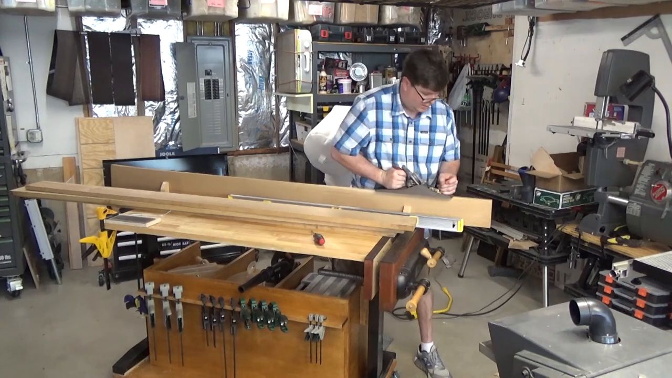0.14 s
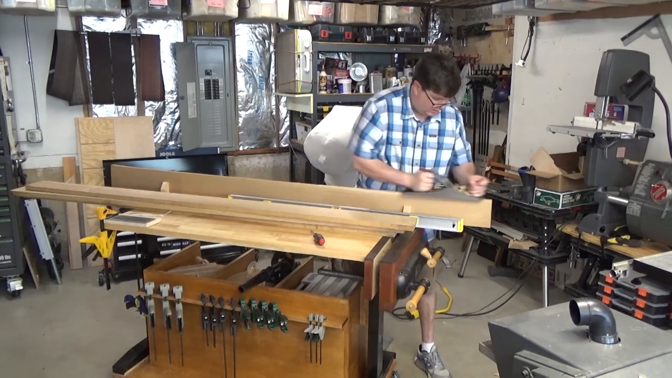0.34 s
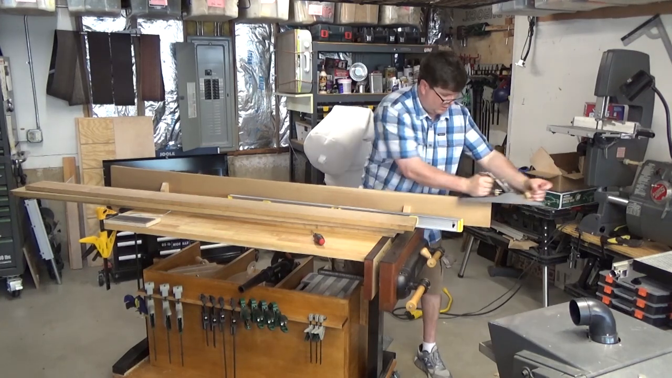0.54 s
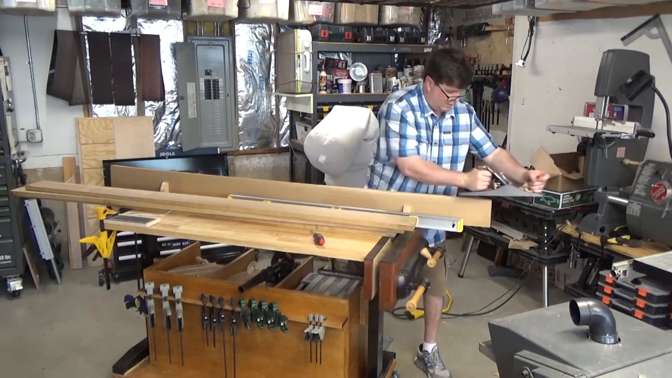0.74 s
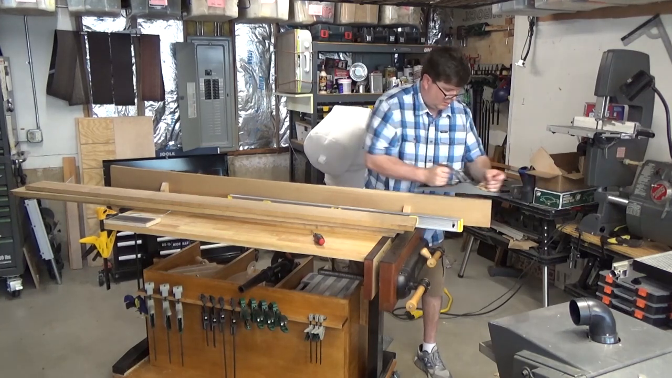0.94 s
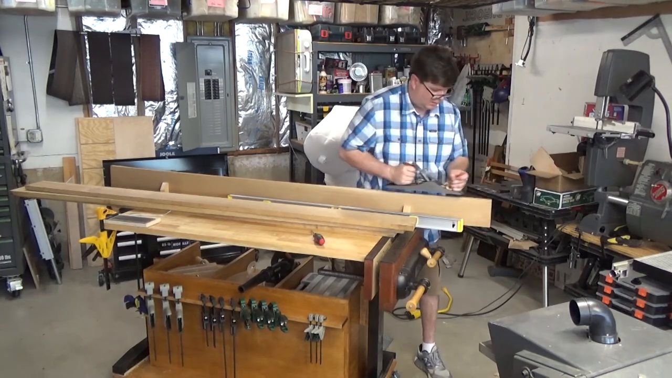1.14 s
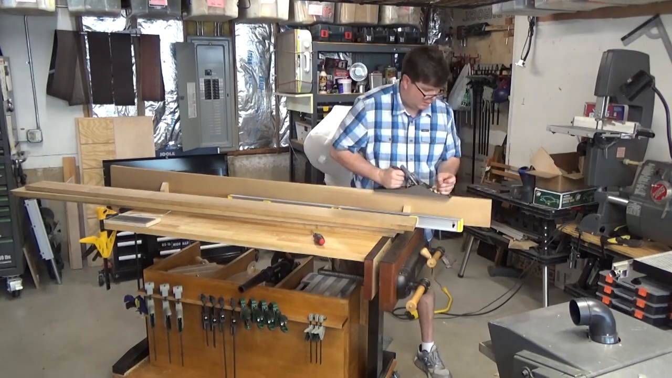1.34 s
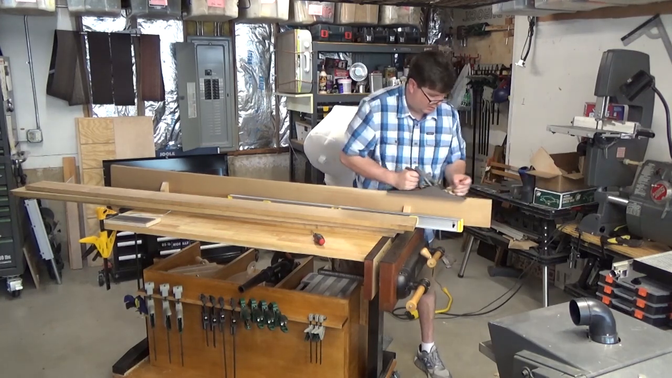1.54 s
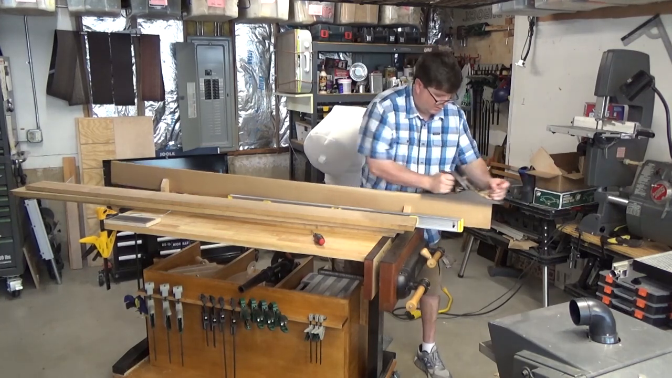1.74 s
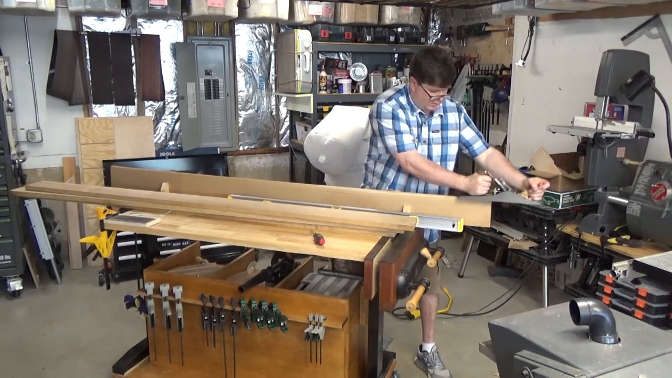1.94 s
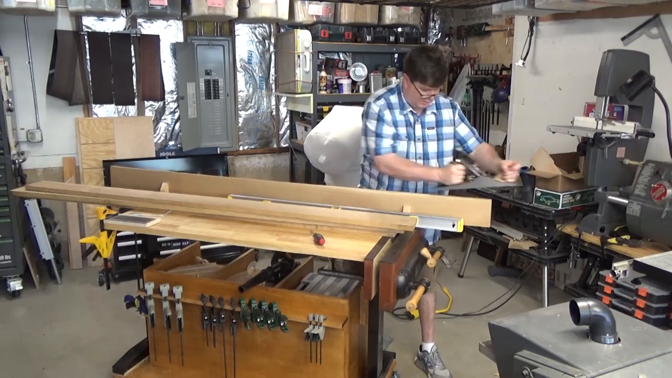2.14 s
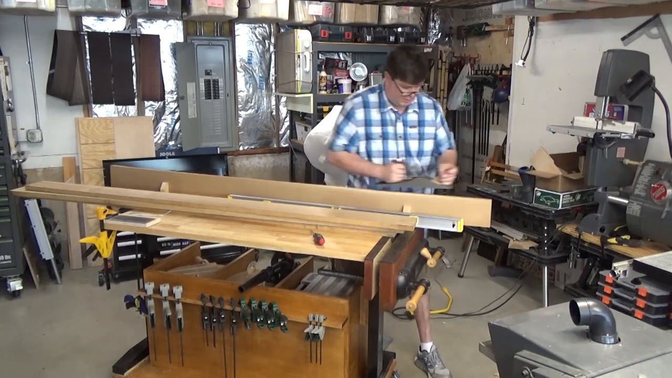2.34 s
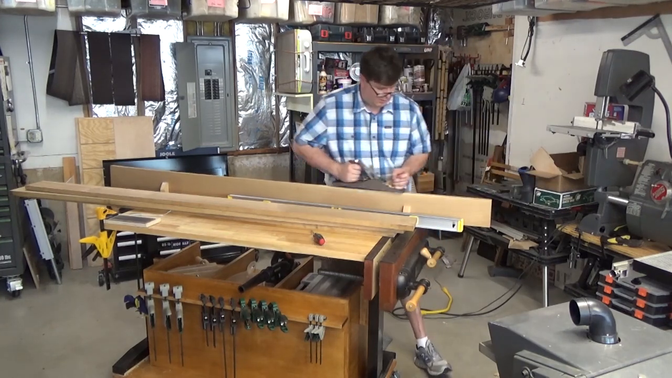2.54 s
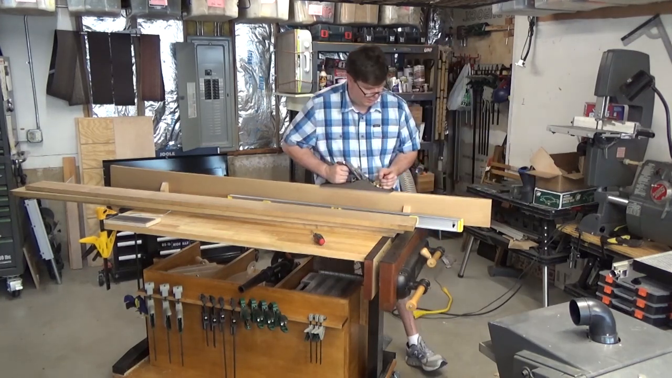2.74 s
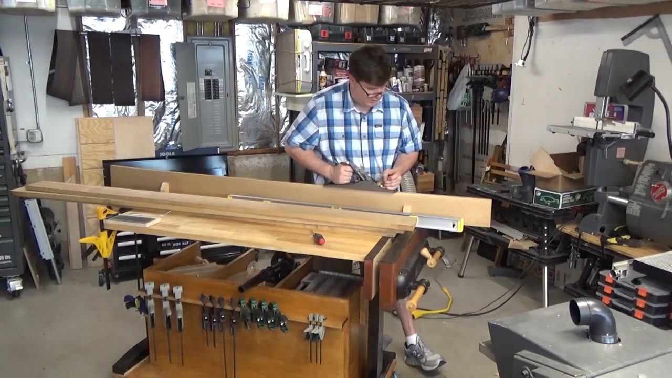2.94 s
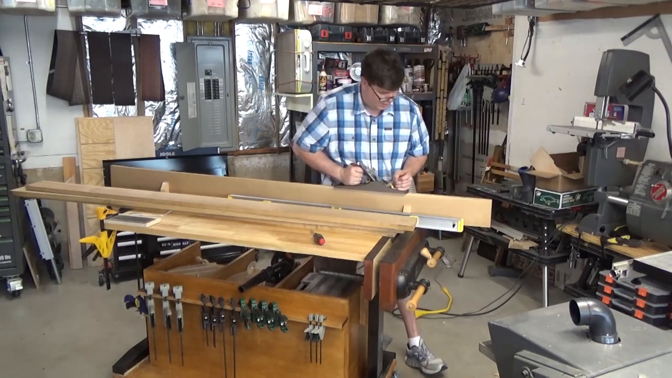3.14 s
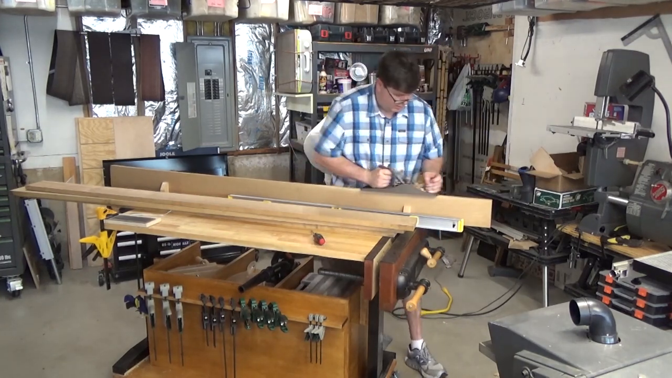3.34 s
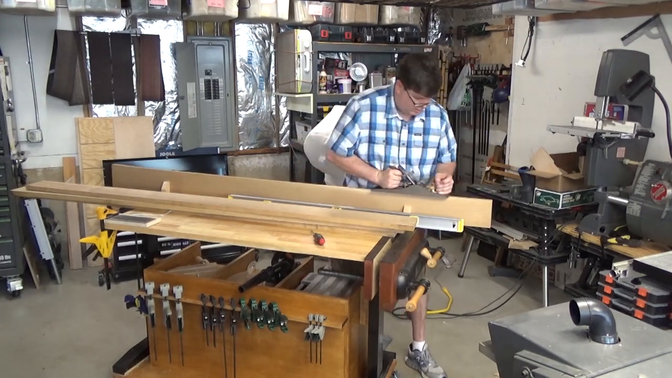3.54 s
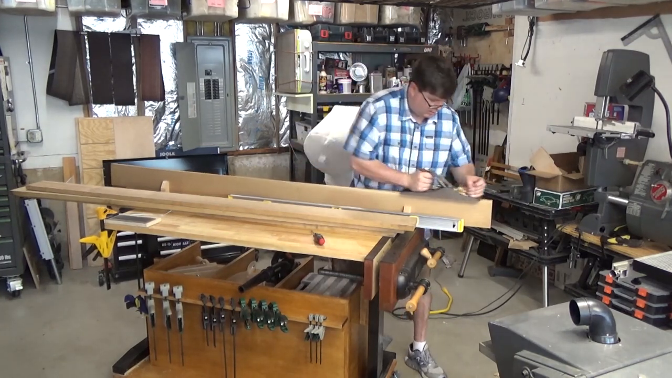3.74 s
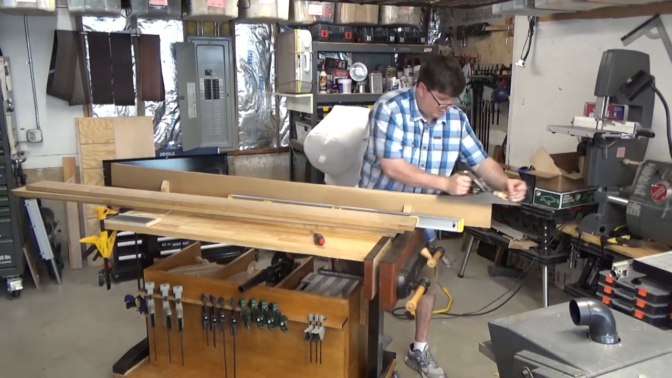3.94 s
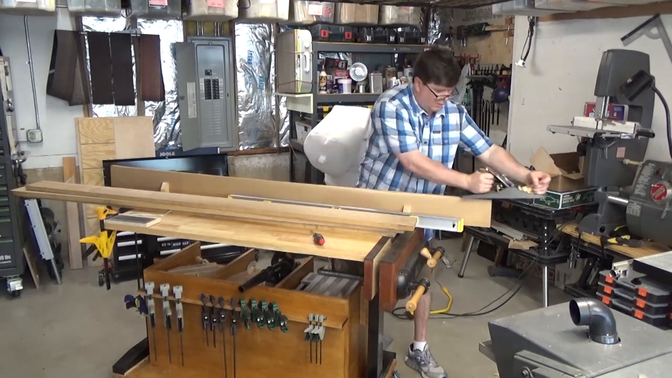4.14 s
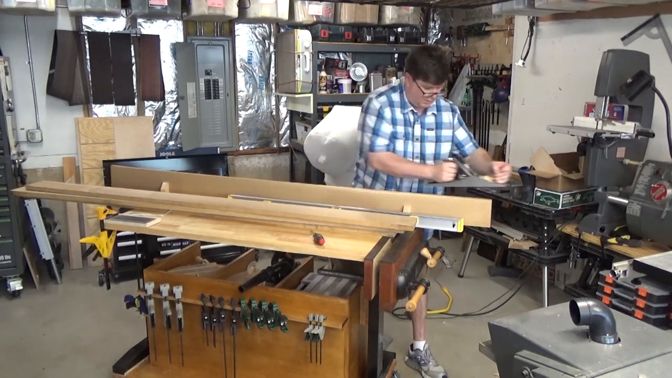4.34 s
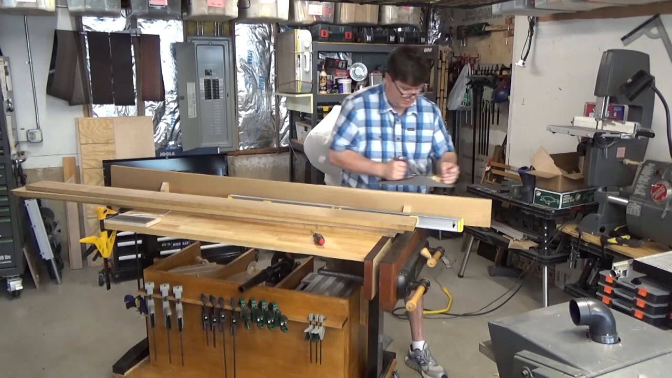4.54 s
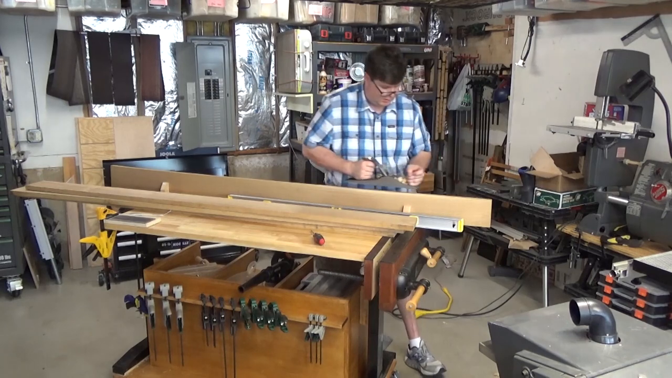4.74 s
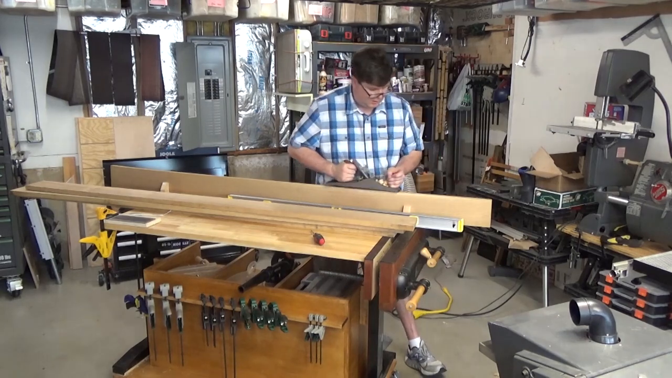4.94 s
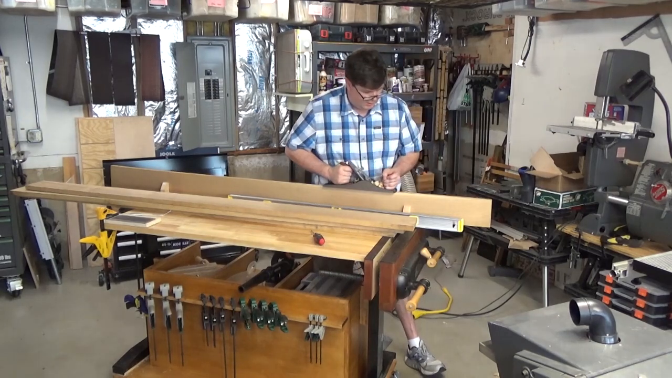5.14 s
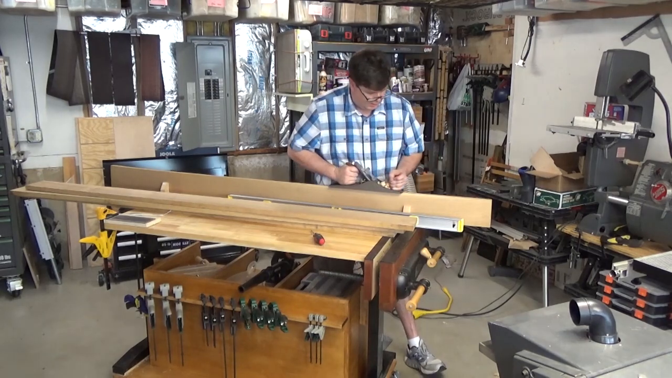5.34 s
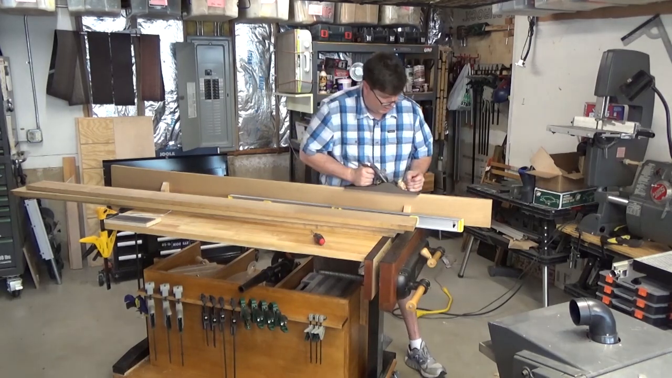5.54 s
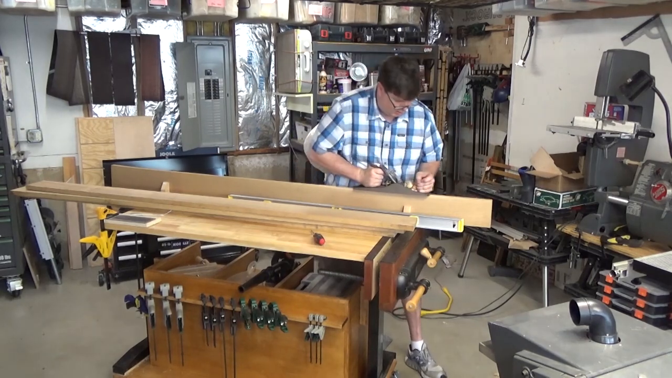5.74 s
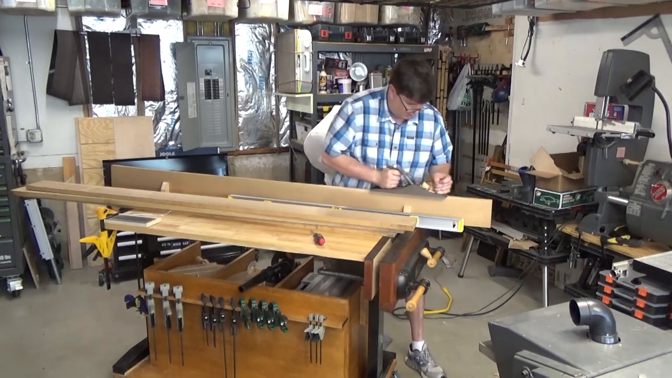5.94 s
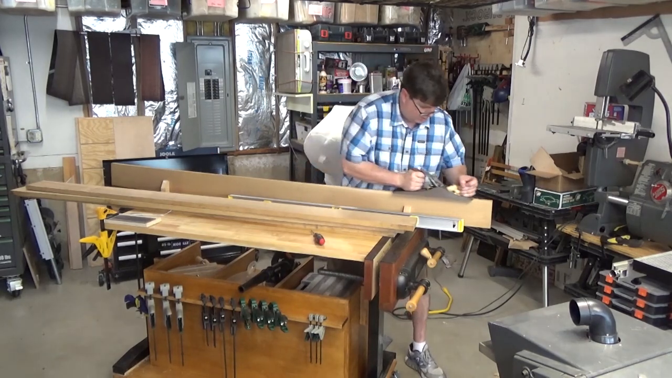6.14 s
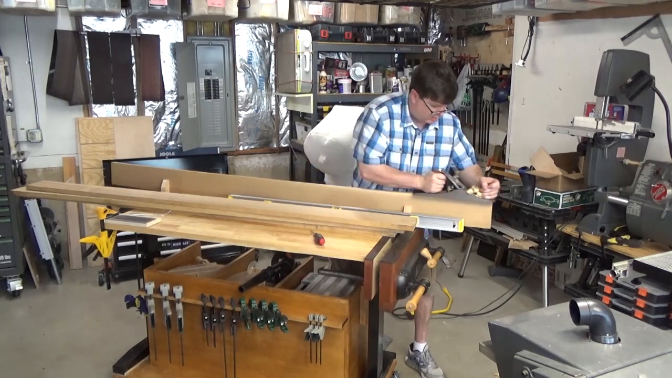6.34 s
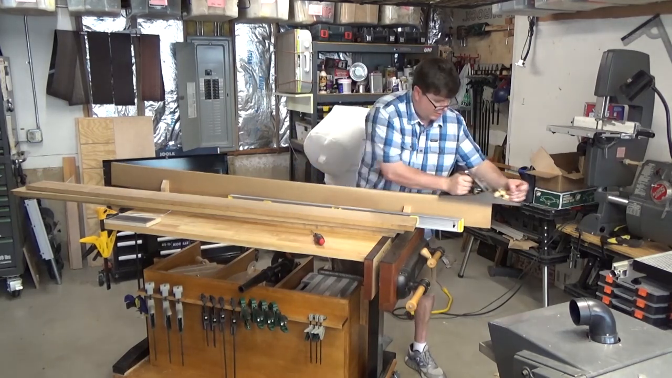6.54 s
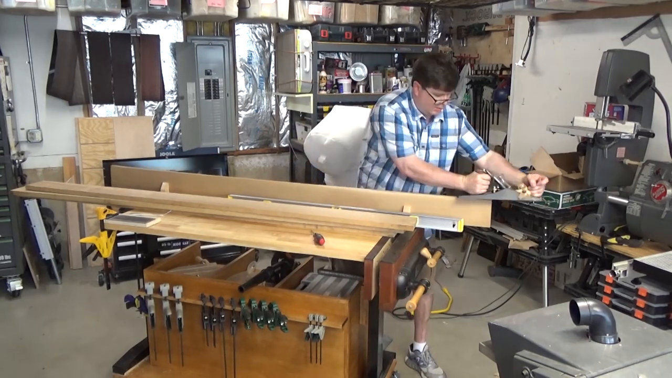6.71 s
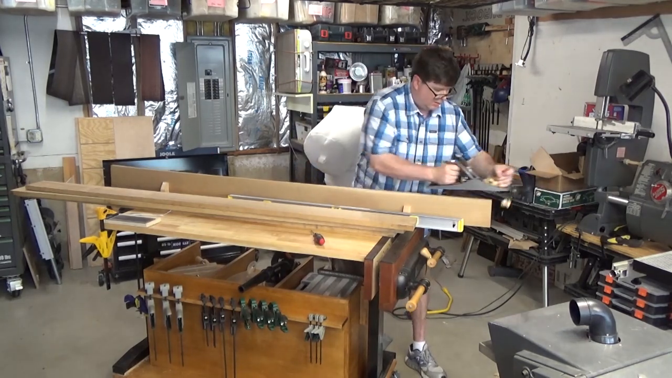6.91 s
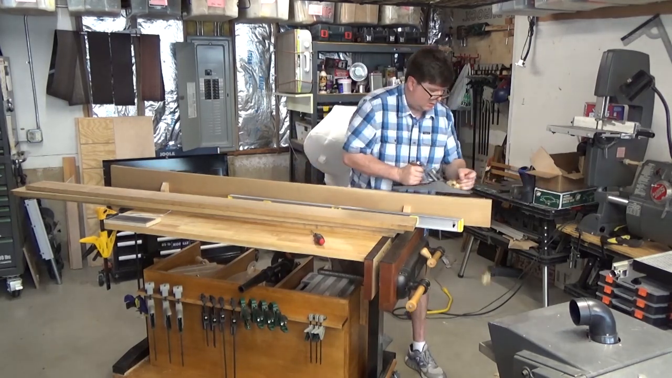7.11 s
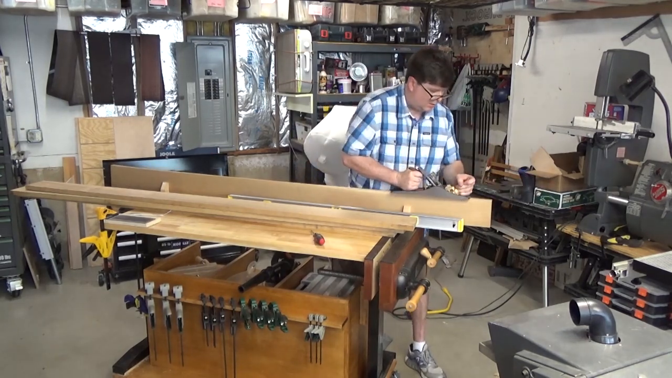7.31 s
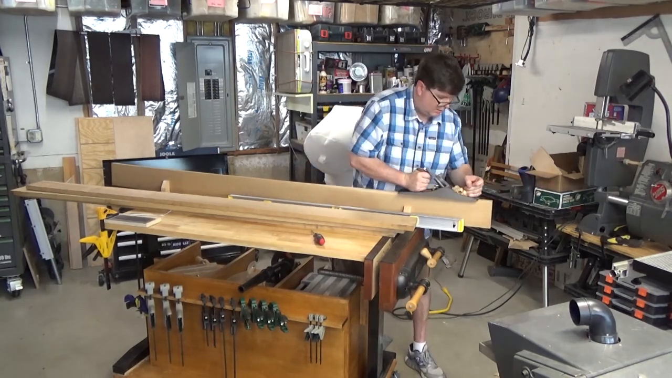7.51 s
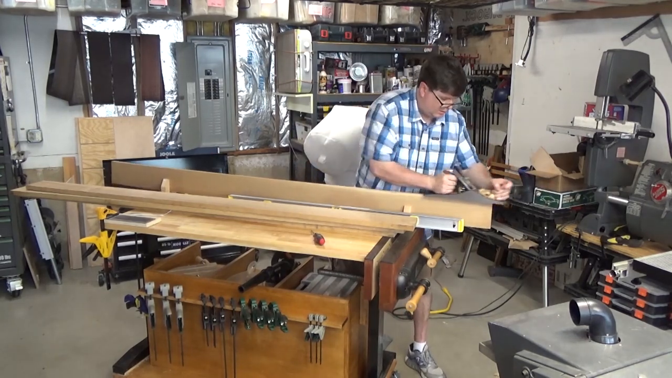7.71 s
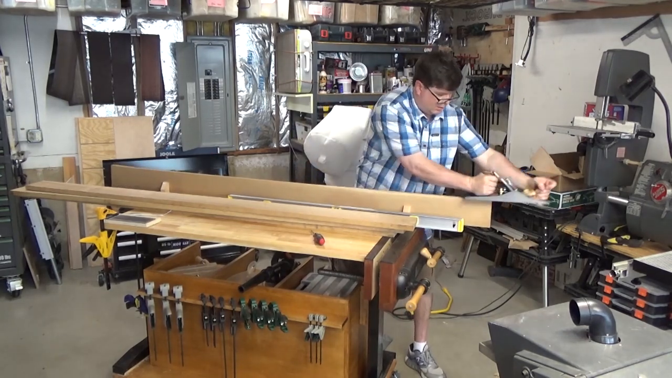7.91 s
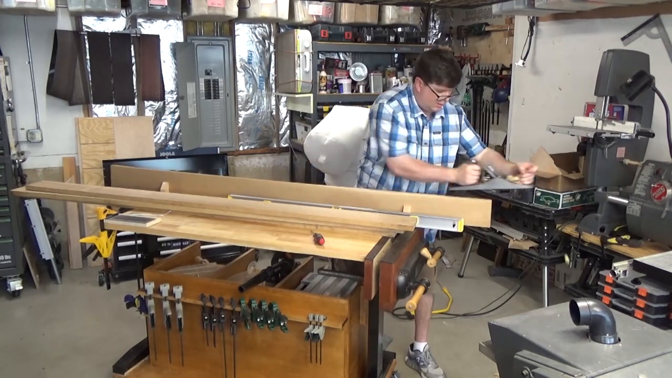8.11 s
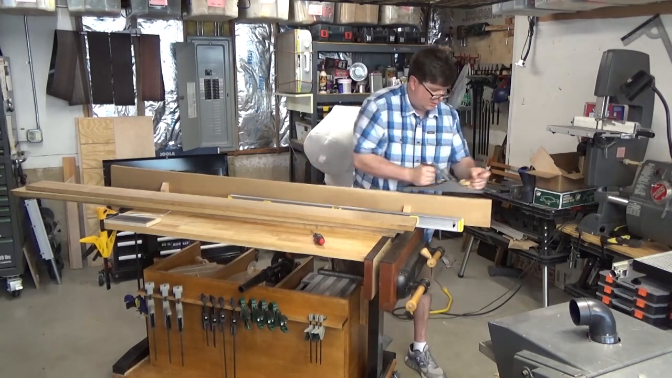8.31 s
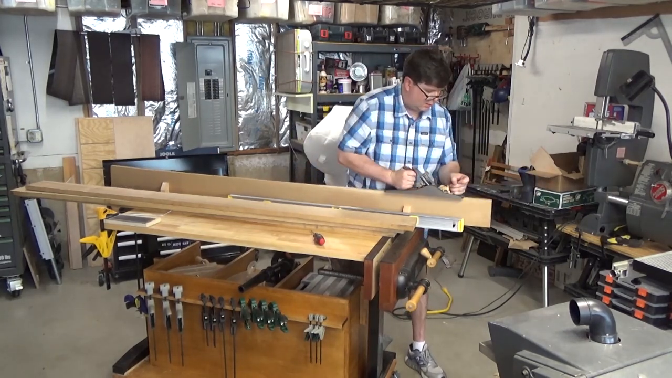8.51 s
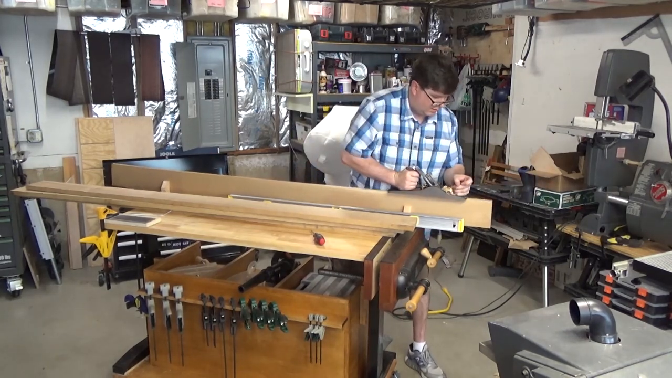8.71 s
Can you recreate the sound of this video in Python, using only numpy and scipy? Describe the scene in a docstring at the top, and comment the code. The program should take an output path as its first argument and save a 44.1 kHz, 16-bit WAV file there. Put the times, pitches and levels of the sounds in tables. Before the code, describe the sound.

A hand plane rasps and hisses through five uneven push strokes along an oak board, with wooden knocks between, in a reverberant workshop.

```python
"""In a small workshop a hand plane takes five push strokes, and starts a sixth, along a long oak board on a bench.
Bunched random fractures, shaped by effort and speed, hiss and rasp, and ring the iron, body, sole and board.
The shaving snaps at a pitch that follows the speed; noise bursts tick.
The board knocks and rattles at touches, drops and run-offs; moving reverberation answers the plane.
Behind it lie still air, a faint fan tone and a thin throbbing whine."""
import sys
import numpy as np
from scipy import signal
from scipy.fft import rfft, irfft, next_fast_len
from scipy.io import wavfile
from scipy.ndimage import uniform_filter1d

SR = 44100
rng = np.random.default_rng(int(sys.argv[2]) if len(sys.argv) > 2 else 0)


def bounce(signal):
    """Save signal as a 16-bit WAV file at the path given by the first command-line argument."""
    frames = np.transpose(np.atleast_2d(signal))
    limited = np.clip(frames, -1, 1)
    pcm = np.round(limited * 32767).astype(np.int16)
    wavfile.write(sys.argv[1], SR, pcm)


N = 386757
T = np.arange(N) / SR
TOP_HZ = 15350

# plane body resonances: (frequency [Hz], width [Hz], level [dB])
PLANE_MODES = [(1130, 130, -6), (1615, 46, 4), (1697, 54, 3.5), (1802, 35, 4.5), (2142, 110, 1.5),
               (2425, 56, 3), (2657, 35, 3.5), (2980, 99, -17), (3218, 41, 4), (3280, 22, 11.5),
               (3150, 25, -14.5)]
# board resonances: (frequency [Hz], width [Hz], level [dB])
BOARD_MODES = [(141, 10.4, -15.5), (199.6, 37, -14.5), (257, 34.6, -10.5), (331.6, 33, 0.5),
               (395.7, 41.2, -0.5), (446, 65, -1.5), (537, 103, -3.5), (640, 81, -2.5), (768, 125, -3),
               (858, 90, -0.5), (960, 120, 1), (1198, 213, -1.5), (1367, 199, -1), (1800, 345, -3.5),
               (2620, 460, -6), (3280, 610, -15.5)]


def undb(db):
    """Decibels to gain."""
    return 10 ** (np.asarray(db) / 20)


def unit(x):
    """Scale to rms 1."""
    return x / np.sqrt(np.mean(x ** 2))


def on_log(points, hz):
    """Read (Hz, value) points on a log-frequency axis."""
    f, value = np.transpose(points)
    return np.interp(np.log(hz + 1), np.log(f), value)


def colour(points, size=2048):
    """Minimum-phase response of unit energy with the given spectrum, by folding the cepstrum."""
    level_db = on_log(points, np.fft.rfftfreq(size, 1 / SR))
    cepstrum = irfft(np.log(undb(level_db)))
    cepstrum[1:size // 2] *= 2
    cepstrum[size // 2 + 1:] = 0
    h = irfft(np.exp(rfft(cepstrum)))
    return h / np.linalg.norm(h)


def ring(modes, size=8192):
    """Impulse response of unit energy: one damped sine a mode, with alternating signs."""
    t = T[:size]
    h = np.zeros(size)
    for k, (hz, width_hz, db) in enumerate(modes):
        decay = np.exp(-np.pi * width_hz * t)
        h += (-1) ** k * undb(db) * width_hz * decay * np.sin(2 * np.pi * hz * t)
    return h / np.linalg.norm(h)


def through(x, h):
    """Pass a sound through a response."""
    return signal.oaconvolve(x, h)[:N]


def filtered(x, order, hz, kind="low"):
    """Butterworth filter."""
    return signal.sosfilt(signal.butter(order, hz, kind, fs=SR, output="sos"), x)


def walk(rate_hz):
    """Smooth random wander of rms 1."""
    k = int(SR / rate_hz)
    held = np.repeat(rng.standard_normal(N // k + 1), k)
    return unit(uniform_filter1d(held, k)[:N])


def slips(rate_hz, spread_db):
    """Random tiny fractures of uneven size and either sign, scaled to rms 1."""
    happens = rng.random(N) < rate_hz / SR
    sign = rng.choice([-1, 1], N)
    return unit(happens * sign * undb(spread_db * rng.standard_normal(N)))


def even(burst, size):
    """Give a one-second burst unit energy and a level spectrum, smoothed over size half-hertz steps."""
    spectrum = rfft(burst, 2 * SR)
    power = uniform_filter1d(abs(spectrum) ** 2, size)
    burst = irfft(spectrum / np.sqrt(power))[:SR]
    return burst / np.linalg.norm(burst)


def background(whine_hz=4000, throb_hz=29.97):
    """Mid and side of still air (coloured noise); fan tone (ringing noise) and throbbing whine in the mid."""
    # (frequency [Hz], level [dB])
    air_spectrum = [(15, -64), (25, -21), (96, -6), (113, -10), (148, -4), (433, -2), (722, -3), (895, 0.5),
                    (1050, -5.5), (1140, -2.5), (3340, -7), (4040, -10.5), (4380, -8), (15500, -21)]
    air = undb(-54) * np.array([through(rng.standard_normal(N), colour(air_spectrum)) for _ in range(2)])
    fan = through(rng.standard_normal(N), ring([(898, 25, 0)]))
    throb = np.exp(4.5 * np.cos(2 * np.pi * throb_hz * (T - .02)))
    whine = unit(throb * np.sin(2 * np.pi * whine_hz * T))
    air[0] += undb(-66) * fan + undb(-63.5) * whine
    return air


def room_tail(build_s=0.00091):
    """Dense reflections off the cluttered walls: noise decaying at a rate set by frequency; unit energy."""
    # (frequency [Hz], decay time to -60 dB [s])
    decay_times = [(150, 0.46), (500, 0.4763), (2000, 0.5266), (5500, 0.5456), (11000, 0.39)]
    hz, t, cells = signal.stft(rng.standard_normal(SR), SR, nperseg=256)
    decay = np.exp(-np.log(1000) * t / on_log(decay_times, hz)[:, None])
    tail = signal.istft(cells * decay, SR)[1][:SR]
    # many modes overlap, so the room favours no broad band
    return even(tail * (1 - np.exp(-T[:SR] / build_s)), size=70)


def room(x, count=5, turn_hz=3.3):
    """Crossfade round several tails: plane and worker keep moving, so the reflections keep changing."""
    place = 2 * np.pi * (turn_hz * T + 0.14 * walk(5))
    shares = np.array([np.maximum(np.cos(place + 2 * np.pi * k / count), 0) for k in range(count)])
    shares /= np.linalg.norm(shares, axis=0)
    return sum(through(x * share, room_tail()) for share in shares)


def ticks(size=16384):
    """Ticks, crinkles and a tiny squeak of shaving and iron: decaying band-passed noise bursts."""
    # (time [s], relative level [dB], centre [Hz], width [octaves], decay [s])
    tick_rows = [(0.071, -7.5, 5300, 1.4, 0.0026), (1.23, -29, 7350, .45, 0.01),
                 (2.025, -6, 2780, 2.4, 0.029), (2.119, -10.5, 5060, 1.4, 0.0035),
                 (2.125, -7.5, 2230, 1.15, 0.059), (2.285, -23, 5760, 1, 0.0017),
                 (2.76, -24, 3000, 2, 0.039), (3.13, -12.5, 4900, 0.97, 0.0052),
                 (8.635, -27, 5200, 0.13, .04), (8.672, -8.5, 4300, 1.5, 0.0026)]
    out = np.zeros(N + size)
    for s, db, hz, octaves, decay_s in tick_rows:
        crack = rng.standard_normal(size) * np.exp(-T[:size] / decay_s)
        half_width = 2 ** (octaves / 2)
        crack = filtered(crack, 2, [hz / half_width, min(hz * half_width, TOP_HZ)], "band")
        i = int(s * SR)
        out[i:i + size] += undb(db + 13.0) * crack / np.linalg.norm(crack)
    return out[:N]


def rattle(rattle_db, decay_s, gap_s=.015, scatter_db=1.5, chatter_hz=1100, count=32):
    """Dull, dying chatter of the board on the bench: unevenly spaced, low-passed blows."""
    lag_s = gap_s * (np.arange(count) + rng.uniform(0.596, 1.4, count))
    size = undb(rattle_db + scatter_db * rng.standard_normal(count)) * np.exp(-lag_s / decay_s)
    size *= rng.choice([-1, 1], count)
    blows = np.zeros(SR)
    np.add.at(blows, np.minimum(lag_s * SR, SR - 1).astype(int), size)
    return filtered(blows, 1, chatter_hz)


def knocks(landing_s=0.0019, scuff_s=0.008):
    """Blows and chatter ring board and bench, a scuff clicks; soft contact leaves only the low modes."""
    # toe touches the board: (time [s], relative level [dB], contact softness [Hz], bench thud [dB])
    touch_rows = [(1.377, -10.5, 1630, -8.5), (2.653, -15.5, 1046, -4.5), (5.099, -12, 1120, -6.5),
                  (7.308, -10.5, 960, -3.5), (8.543, -8.5, 820, -6)]
    # whole sole drops flat: (time [s], relative level [dB], contact softness [Hz], bench thud [dB])
    drop_rows = [(0.002, -12.5, 1530, -8), (1.43, 0.5, 1520, -10), (2.772, -22.5, 1190, -5.5),
                 (7.355, 1.5, 1346, -13.5), (8.612, -7.5, 825, -16)]
    # plane runs off the end, board springs back:
    # (time [s], relative level [dB], contact softness [Hz], bench thud [dB])
    run_off_rows = [(0.604, -11.5, 660, -13), (2.009, 2.5, 755, -11.5), (4.052, -8.5, 676, -14),
                    (6.668, -2.5, 638, -13), (7.967, -1, 700, -12)]
    # what each kind of contact sets off: (rattle [dB], rattle decay [s], metal click [dB])
    touch_contact = (0, 0.073, -13)
    drop_contact = (-6.5, 0.027, -19.5)
    run_off_contact = (-1.5, .11, -15)
    # low modes of the bench under the board: (frequency [Hz], width [Hz], level [dB])
    bench_modes = [(246, 42, -8), (271, 43, -4.5), (325.6, 34.3, 2.5), (378.3, 39.6, -1), (474, 29.3, -7)]
    # click spectrum: (frequency [Hz], level [dB])
    click_spectrum = [(100, -62), (1000, 6.5), (2500, 10), (4000, 3), (6500, -0.5), (9500, -10.5),
                      (11000, -18), (15000, -33)]

    force, thud, clicks = np.zeros((3, N))
    kinds = [(touch_rows, touch_contact), (drop_rows, drop_contact), (run_off_rows, run_off_contact)]
    events = [(*row, *contact) for rows, contact in kinds for row in rows]
    for s, db, soft_hz, thud_db, rattle_db, decay_s, click_db in events:
        # the long sole meets the wood over a few milliseconds
        landing = rng.standard_normal(SR) * T[:SR] * np.exp(-T[:SR] / landing_s)
        blows = rattle(rattle_db, decay_s) + even(landing, size=300)
        push = undb(db) * filtered(blows, 3, soft_hz)
        # the steel sole lands with a short gritty scuff
        scuff = rng.standard_normal(SR) * np.exp(-T[:SR] / scuff_s)
        scuff *= undb(db + click_db) / np.linalg.norm(scuff)
        i = max(int(s * SR), 0)
        force[i:i + SR] += push[:N - i]
        thud[i:i + SR] += undb(thud_db) * push[:N - i]
        clicks[i:i + SR] += scuff[:N - i]
    board = undb(20.5) * through(force, ring(BOARD_MODES))
    bench = undb(23.0) * through(thud, ring(bench_modes))
    return board + bench + undb(20.5) * through(clicks, colour(click_spectrum))


def pushes(attack_db_per_s=300, release_db_per_s=800):
    """Effort and speed of the plane; the effort rises quickly before each push and collapses after it."""
    # one table a push, first bite until the iron leaves the wood: (time [s], effort [dB], speed [m/s])
    push_1 = [(0, -31.5, 0.73), (0.077, -24, 0.78), (0.176, -30.5, 0.55), (0.317, -19.5, 0.61),
              (0.352, -15, 1.13), (0.451, -10.5, 2.09), (0.501, -3, 2.22), (0.55, -24, 0.56)]
    push_2 = [(1.555, -26.5, 0.64), (1.59, -27, 0.89), (1.657, -15, 2.16), (1.723, -18, 1.05),
              (1.853, -9, 1.7), (1.89, -15.5, 1), (1.919, -16.5, 0.6)]
    # nearly stalls halfway: (time [s], effort [dB], speed [m/s])
    push_3 = [(2.94, -42.5, 0.66), (3.061, -27, 0.64), (3.13, -27, 0.8), (3.18, -31.5, 0.52),
              (3.31, -26, 0.82), (3.386, -12, 2.34), (3.43, -15, 0.93), (3.479, -26, 0.54),
              (3.594, -28, 0.62), (3.643, -21, 0.5), (3.74, -15.5, 1.2), (3.878, -15, 1.16),
              (4.003, -11.5, 1.03), (4.035, -21.5, 0.72)]
    # slow and laboured: (time [s], effort [dB], speed [m/s])
    push_4 = [(5.33, -42, 0.58), (5.52, -26, 1.05), (5.585, -27, 0.58), (5.66, -29.5, 0.54),
              (5.78, -26, 0.57), (5.85, -22, 0.59), (5.99, -20, 0.64), (6.05, -22, 0.99), (6.2, -18, 0.74),
              (6.36, -17.5, 0.68), (6.469, -16, 0.72), (6.521, -14.5, 0.8), (6.576, -13, 0.9),
              (6.62, -13, 0.69)]
    push_5 = [(7.41, -36, 0.92), (7.53, -32.5, 0.69), (7.626, -16.5, 0.67), (7.705, -17.5, 0.77),
              (7.808, -13, 1), (7.876, -13.5, 0.82), (7.902, -21.5, 0.6)]
    # only just begun: (time [s], effort [dB], speed [m/s])
    push_6 = [(8.621, -32.5, 0.53), (8.673, -26.5, 0.74), (8.761, -49.5, 0.93)]
    effort, speed = np.zeros(N), np.ones(N)
    for push in (push_1, push_2, push_3, push_4, push_5, push_6):
        s, db, m_per_s = np.transpose(push)
        before_s, after_s = np.maximum(s[0] - T, 0), np.maximum(T - s[-1], 0)
        fade_db = attack_db_per_s * before_s + release_db_per_s * after_s
        gain = undb(np.interp(T, s, db) - np.minimum(fade_db, 200))
        speed = np.where(gain > effort, np.interp(T, s, m_per_s), speed)
        effort = np.maximum(effort, gain)
    return effort, speed


def response(speed, law):
    """Gain of one part of the cutting sound: a bell round its best speed, on a low plateau."""
    best, octaves, gain_db, rest_db = law
    bell = np.exp(-(np.log2(np.maximum(speed, 1e-3) / best) / octaves) ** 2)
    return undb(gain_db) * np.sqrt(bell + undb(rest_db) ** 2)


def hissing_shaving(drive):
    """Breaking fibres heard through the shaving."""
    # (frequency [Hz], level [dB])
    shaving_spectrum = [(1500, -28), (2400, -3.5), (3200, -1.5), (3800, -5), (4400, -1), (6700, 1.5),
                        (7300, -5), (9700, -9.5), (11000, -16.5), (14000, -25), (16000, -54)]
    return undb(-1.3) * through(slips(6000, spread_db=3.0) * drive, colour(shaving_spectrum))


def torn_fibres(drive):
    """Sparser tears rasp in the wood."""
    # (frequency [Hz], level [dB])
    rasp_spectrum = [(200, -81), (600, -27.5), (1000, -3.5), (1300, 4), (1800, 3), (2200, 1), (3400, 1.5),
                     (4000, -8), (7000, -38)]
    return undb(0.5) * through(slips(2500, spread_db=3.5) * drive, colour(rasp_spectrum))


def ringing_iron(drive):
    """Jolts of the cutting edge ring the iron."""
    # (frequency [Hz], width [Hz], level [dB])
    iron_modes = [(3216, 34, -8), (4450, 120, -8), (4970, 39, -19), (5060, 45, -10), (5560, 29.24, -2),
                  (5930, 32, 4), (6700, 45, 0), (6515, 140, 0.5), (8040, 112.5, -14), (8090, 160, -1.5),
                  (9380, 140, -6)]
    return undb(-13.0) * through(slips(3000, spread_db=2.0) * drive, ring(iron_modes))


def ringing_body(drive):
    """Jolts of the cutting edge ring the cast body."""
    return undb(-2.5) * through(slips(1500, spread_db=0.5) * drive, ring(PLANE_MODES))


def dragging_sole(drive):
    """The sole sticks and slips, ringing its modes."""
    # (frequency [Hz], width [Hz], level [dB])
    sole_modes = [(638, 55, -7), (786, 102, -6), (865.2, 30.7, 1.5), (941, 43, -2), (980, 96, -7),
                  (1198, 193, -12.5)]
    return undb(0.14) * through(slips(700, spread_db=1.0) * drive, ring(sole_modes))


def juddering_board(gain):
    """Sparse slips ring the board near a stall."""
    # (frequency [Hz], level [dB])
    judder_spectrum = [(30, -15), (130, -14.5), (205, 2.5), (270, 0), (380, -2), (500, 3), (750, -9),
                       (1500, -12)]
    board = through(slips(400, spread_db=3.5), ring(BOARD_MODES))
    return undb(3.1) * unit(through(board, colour(judder_spectrum))) * gain


def snapping_curl(speed, drive, snap_step_m=.00053, jitter=.2):
    """The shaving snaps at short uneven steps, a rough tone that follows the speed and rings the body."""
    hz = speed / snap_step_m * (1 + jitter * walk(900))
    snapping = unit(walk(400) * np.sin(2 * np.pi * np.cumsum(hz) / SR)) * drive
    return snapping + undb(-8.5) * through(snapping, ring(PLANE_MODES))


def strokes():
    """Fibres break in bunches as the iron crosses the grain; the sole sticks and slips behind it."""
    # hiss, rasp, snap, drag, judder:
    # (best speed [m/s], range [octaves], gain [dB], share left at other speeds [dB])
    cut_laws = [(1.23, 0.48, -0.48, -5.5), (0.95, 0.49, -5, -15), (0.68, 0.38, -8, -26),
                (.35, 0.79, 0.86, -23), (0.39, .29, 6, -38)]
    effort, speed = pushes()
    # a fast plane hisses, a slower one rasps, then the sole drags, and near a stall the board judders
    hiss, rasp, snap, drag, judder = (effort * response(speed, law) for law in cut_laws)
    grain = unit(undb(2.15 * walk(260) + 2.0 * walk(45)))
    wood = hissing_shaving(grain * hiss) + torn_fibres(grain * rasp)
    metal = ringing_iron(grain * hiss) + ringing_body(grain * rasp)
    friction = dragging_sole(grain * drag) + juddering_board(judder)
    return wood + metal + friction + snapping_curl(speed, grain * snap)


def scene():
    """The bench stands a few metres off: room louder than direct sound, bass nearly alike on both sides."""
    # (frequency [Hz], side gain [dB])
    side_width = [(60, -21.5), (130, -46), (260, -28), (520, -15), (1200, -7.5), (2500, -8), (8500, -9),
                  (11500, -29)]
    # a slim board radiates almost no deep bass
    dry = filtered(strokes() + knocks() + ticks(), 3, 130, "high")
    air_mid, air_side = background()
    wet = undb(-1.64) * dry
    mid = undb(-6.0) * dry + room(wet) + air_mid
    side = room(wet) + air_side
    size = next_fast_len(N)
    side_gain = undb(on_log(side_width, np.fft.rfftfreq(size, 1 / SR)))
    side = irfft(rfft(side, size) * side_gain, size)[:N]
    return np.array([mid + side, mid - side])


def record(dry):
    """Clip at full scale, then cut the top with a steep low-pass."""
    lowpass = signal.ellip(10, .1, 80, TOP_HZ, fs=SR, output="sos")
    return signal.sosfilt(lowpass, np.clip(dry, -1, 1))


dry = scene()
out = record(dry)
bounce(out)
```